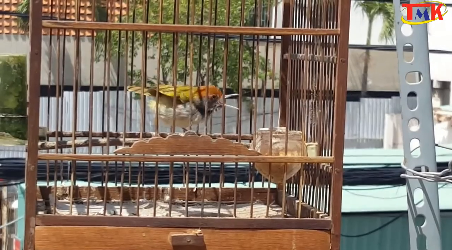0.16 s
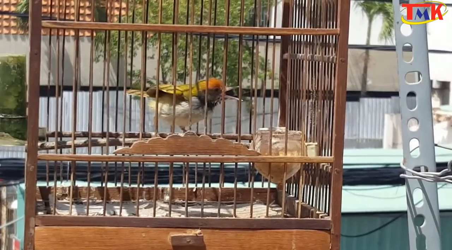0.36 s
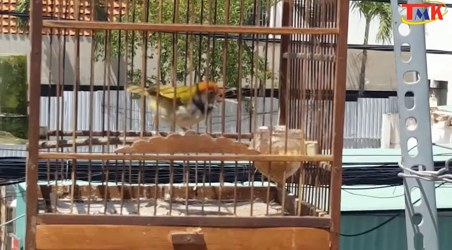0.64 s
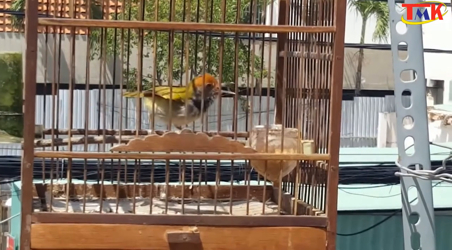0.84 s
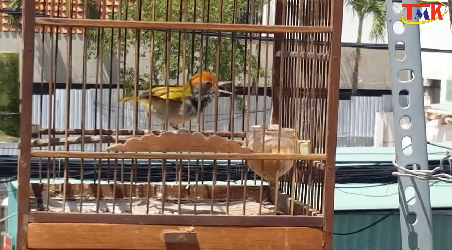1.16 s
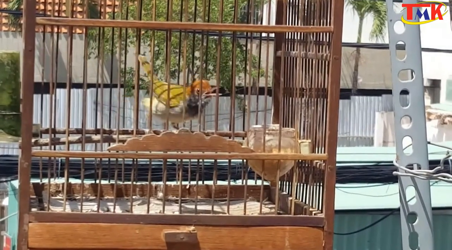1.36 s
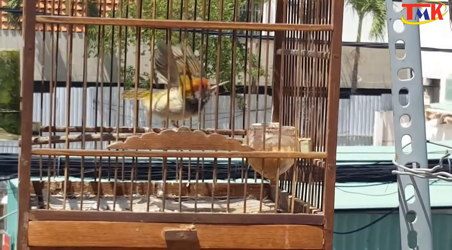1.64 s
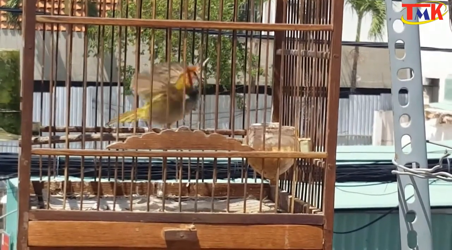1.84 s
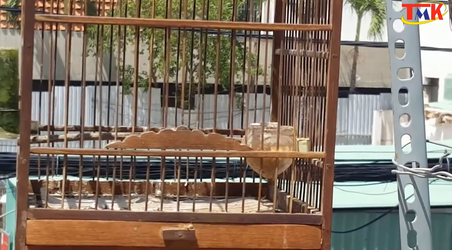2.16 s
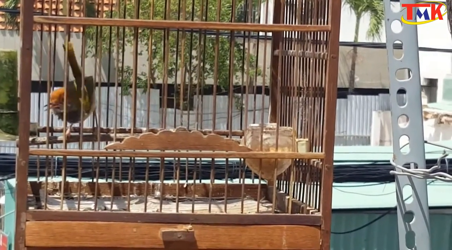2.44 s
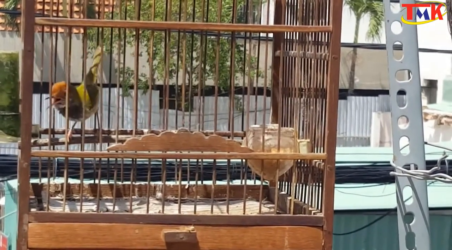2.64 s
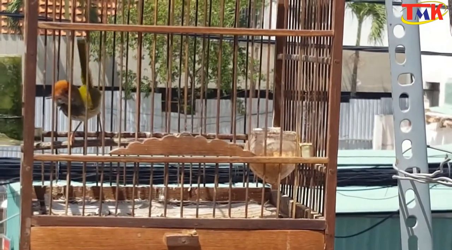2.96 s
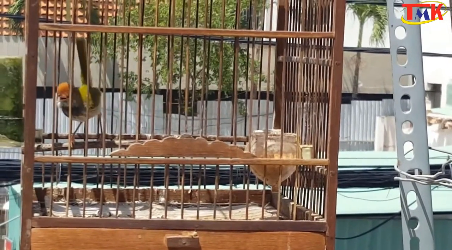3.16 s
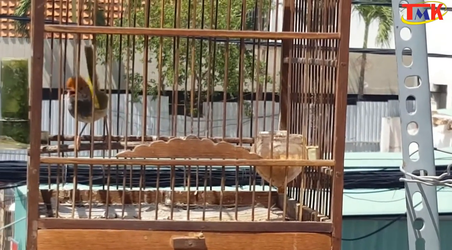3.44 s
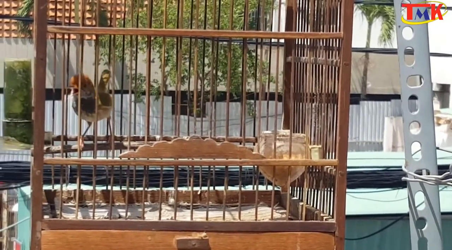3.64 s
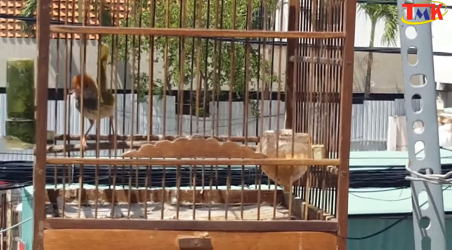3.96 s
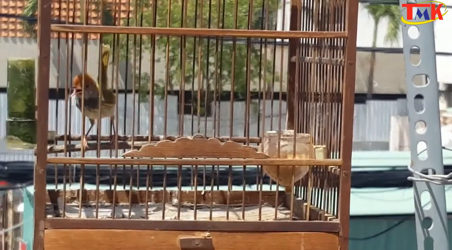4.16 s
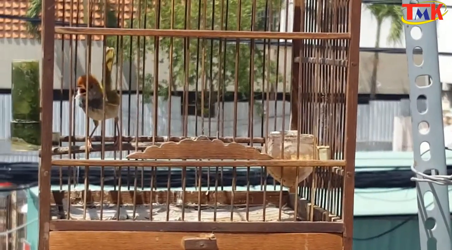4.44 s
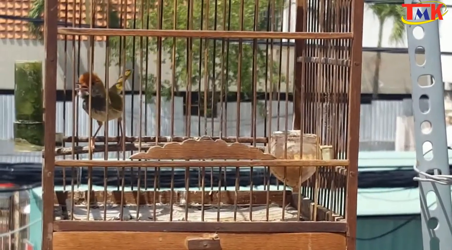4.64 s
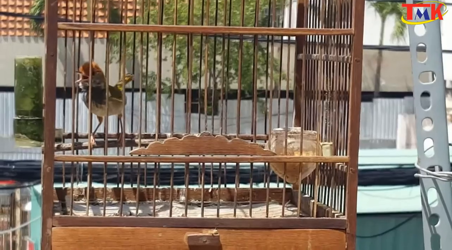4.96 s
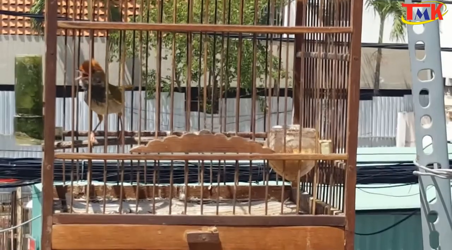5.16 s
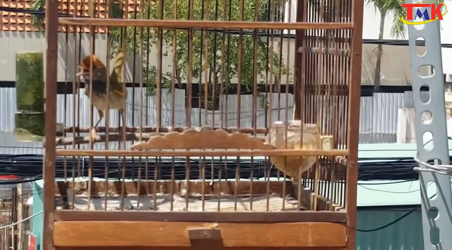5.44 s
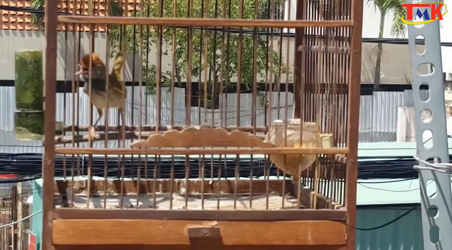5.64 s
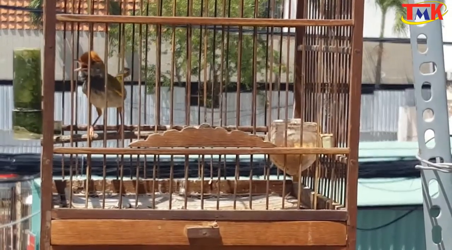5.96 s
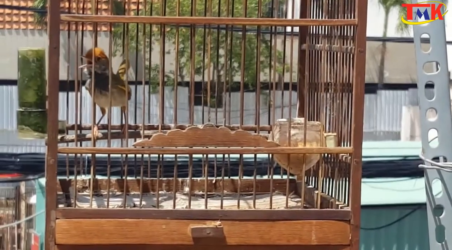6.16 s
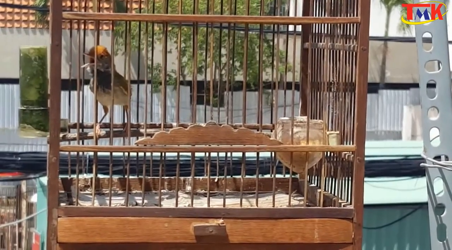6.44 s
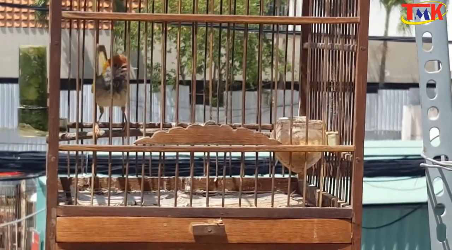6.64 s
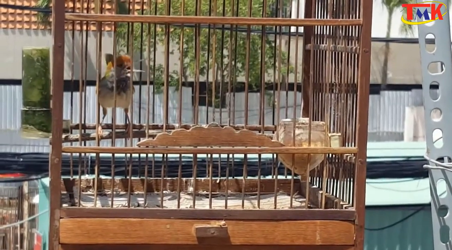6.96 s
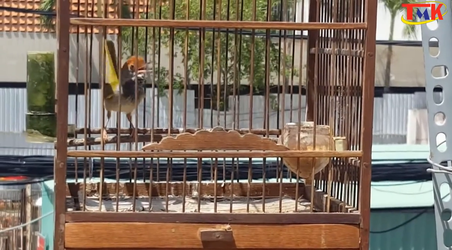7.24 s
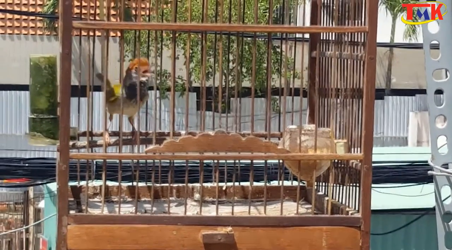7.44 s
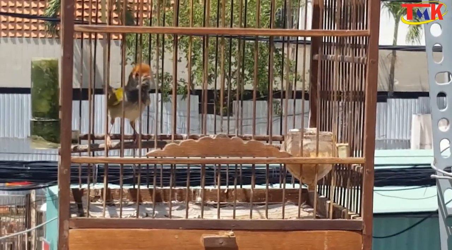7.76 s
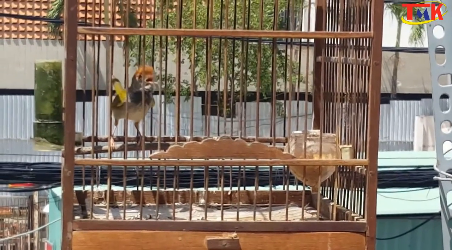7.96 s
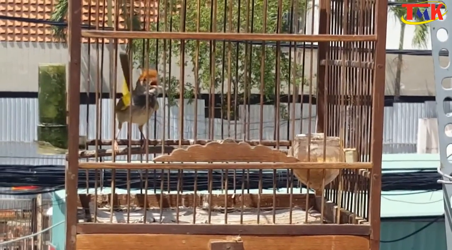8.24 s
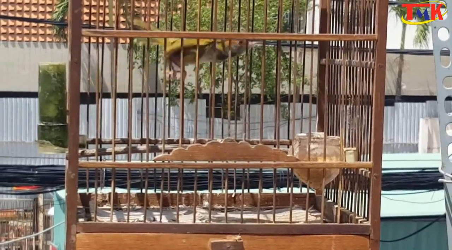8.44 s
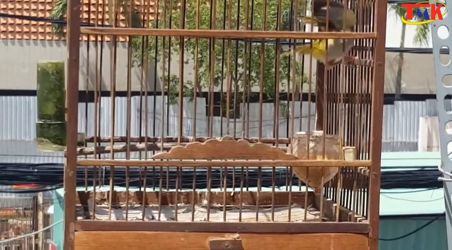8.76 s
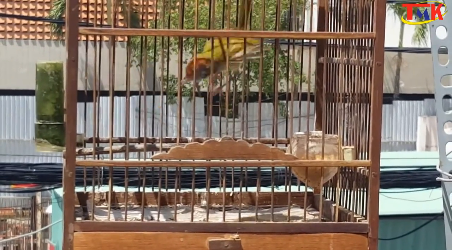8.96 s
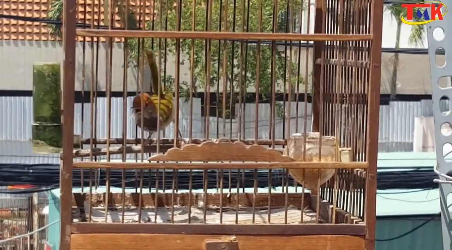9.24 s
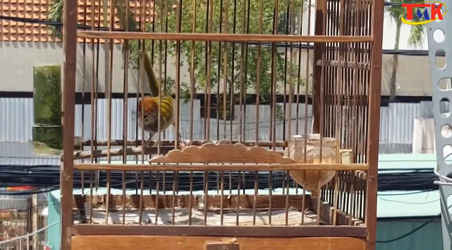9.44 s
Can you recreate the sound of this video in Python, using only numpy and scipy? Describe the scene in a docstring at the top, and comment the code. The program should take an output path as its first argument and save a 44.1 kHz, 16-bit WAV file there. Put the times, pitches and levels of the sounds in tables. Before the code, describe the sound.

A close, bright, slightly left-sided songbird gives seven evenly shaped bursts over nearly ten seconds, each a sharp tick, a fast crescendo of machine-like pulses and an abrupt clear final note. Less prominent birds around the terrace answer with thin whistles, rough chirps, fluttering falls and quick slurs, busiest between three and five seconds. Wall reflections blur them; low, quiet, steady distant traffic lies underneath, heard through an open outdoor microphone.

```python
"""A small caged bird on a roof terrace sings seven times: a chip, a swelling trill, a held note,
each a near-sine tone that follows a pitch and level curve.
Other birds whistle, slur, dip and chirp with rougher tones; sparse reflections smear them off the walls.
Underneath, shaped noise makes the low roar of a city, with two wavering engine drones."""
import sys
import numpy as np
from scipy import signal
from scipy.io import wavfile
from scipy.ndimage import uniform_filter1d

SR = 44100
rng = np.random.default_rng(int(sys.argv[2]) if len(sys.argv) > 2 else 0)


def digitize_waveform(pressure):
    """Quantize a signal to 16-bit integers and store it at the path in sys.argv[1].

    Rows of a 2-D input are taken as channels; values are limited to [-1, 1].
    """
    field = np.atleast_2d(pressure).T
    bounded = np.clip(field, -1, 1)
    quanta = np.round(bounded * 32767).astype(np.int16)
    wavfile.write(sys.argv[1], SR, quanta)


N = 423801  # length of the scene [samples]

# colour of the city noise: (frequency [Hz], relative density [dB per Hz])
CITY_SPECTRUM = [(25, -42), (50, -28), (85, -0.5), (105, 5.5), (138, -5), (190, -8.5), (900, -22),
                 (3000, -26.5), (8500, -35.5), (9600, -48.5), (13000, -59), (15500, -48.5)]
# slow swell of the city noise: (time [s], level [dB]); each band scales the moves about the mean
TRAFFIC_SWELL = [(0, -32), (.8, -33), (2.201, -33), (4.299, -32), (6.299, -33), (7.8, -34.5), (9.6, -35)]
# stereo likeness of the city noise: (frequency [Hz], left-right correlation [-1 to 1])
STEREO_LIKENESS = [(60, 0.95), (300, 0.87), (1500, -0.15), (4000, -0.028)]
# treble haze and far chirps: (time [s], level [dB]); only scaled moves about the mean are heard
TREBLE_SWELL = [(0, -59), (1.1, -50.5), (2.7, -56), (4.199, -54), (5.0, -47.5), (5.55, -55.5), (7.6, -49.5),
                (7.9, -57.5), (8.4, -62), (8.9, -47), (9.6, -49.5)]
# distant engines: (frequency [Hz], bandwidth [Hz], level [dB])
ENGINE_DRONES = [(80.2, 8.8, -42), (139.13, 3.2, -37.5)]

# husky level chirps, farther off: (time [s], pitch [Hz], level [dB])
CHEEP_CALLS = [(1.317, 5460, -41.5), (1.5, 5510, -37.5), (2.033, 5440, -39), (2.188, 5470, -38.5),
               (2.791, 4500, -44), (3.15, 4540, -45.5), (7.03, 6090, -37), (8.178, 6030, -47.5),
               (8.76, 5650, -48), (5.77, 4900, -51), (4.41, 6240, -44), (4.53, 6480, -40.5),
               (5.133, 6600, -40), (5.187, 6000, -36), (8.997, 7100, -40), (9.038, 5810, -37.5),
               (9.085, 4520, -46.5), (9.513, 5220, -40)]
CHEEP_S = 0.056
# rising chirps: (time [s], start pitch [Hz], level [dB])
TWEET_CALLS = [(0.691, 4700, -46.5), (2.29, 4860, -34.5), (2.444, 5370, -34), (5.022, 4780, -38),
               (5.397, 5500, -43.5), (5.824, 5690, -38), (5.998, 5760, -38), (6.06, 4260, -37.5),
               (6.191, 5296, -38.5), (6.456, 5540, -39.5), (7.437, 5540, -45.5), (8.861, 5380, -44.5)]
TWEET_S, TWEET_HALF, TWEET_TOP = 0.044, 1.2, 1.32  # length [s]; pitch factors halfway and at the end
# short bent notes of several kinds:
# (time [s], length [s], start pitch [Hz], bend pitch [Hz], end pitch [Hz], level [dB])
BENT_NOTES = [(0.083, 0.011, 4230, 3700, 3450, -35), (2.827, 0.069, 6640, 5150, 6790, -33),
              (2.985, 0.11, 7050, 6350, 5766, -33.5), (3.183, 0.079, 7160, 5460, 6890, -28),
              (3.357, 0.1, 6240, 6650, 5740, -30.5), (3.518, 0.079, 5020, 4880, 4790, -35.5),
              (3.586, 0.035, 4790, 5610, 5720, -31.5), (3.614, 0.072, 8100, 6320, 5230, -30),
              (3.773, 0.12, 4440, 5920, 4700, -31.5), (3.989, .1, 8280, 7940, 8070, -35.5),
              (4.755, 0.024, 6980, 6920, 6440, -29), (4.854, 0.1, 5560, 5240, 6050, -37.5),
              (8.237, .12, 4550, 4350, 3190, -47.5), (9.374, 0.078, 8070, 7540, 6600, -42.5)]
# shares of the note: about where it bends, where it settles on its end pitch, and
# the turn, which holds the bend pitch from half a turn before to one turn after
BEND, SETTLE, TURN = 0.32, 0.74, .08

# level whistles around the terrace: (time [s], length [s], middle pitch [Hz], level [dB])
WHISTLE_CALLS = [(0, 0.11, 2490, -43.5), (1.078, 0.28, 2470, -49), (1.587, 0.26, 2120, -48),
                 (2.318, 0.094, 2367, -44.5), (2.459, 0.11, 2444, -46), (2.586, 0.1, 2483, -35.5),
                 (3.017, 0.19, 2126, -44.5), (3.114, 0.062, 3200, -48), (3.681, 0.33, 2438, -46),
                 (4.006, 0.078, 3705, -33), (4.018, 0.058, 4250, -29), (4.014, 0.074, 3253, -30.5),
                 (4.702, 0.2, 2126, -47.5), (5.057, 0.32, 2475, -42), (6.397, 0.068, 2463, -44.5),
                 (6.52, 0.17, 2460, -44.5), (6.794, 0.193, 3098, -40), (6.877, 0.24, 2123, -41),
                 (7.637, 0.31, 2476, -43.5), (8.608, 0.036, 3070, -37), (8.631, 0.295, 3070, -42),
                 (8.89, 0.056, 2090, -49), (8.95, 0.185, 2125, -45), (9.207, 0.15, 2500, -46.5)]
CREEP_PER_S = 0.07  # whistles creep upward by this share of their pitch [1/s]
SCOOP, SCOOP_S = .97, .03  # whistles scoop up from this pitch factor, over at most this time [s]
# long fluttering falls: (time [s], length [s], top pitch [Hz], bottom pitch [Hz], level [dB])
FALL_CALLS = [(3.5, .13, 4204, 3550, -38.5), (3.723, .24, 4600, 3550, -33.5), (4.091, .21, 4610, 3180, -36),
              (4.386, 0.21, 4595, 3220, -35)]
HOOK_S, HOOK = .028, .94  # each fall hooks up to its top by this time [s], from this pitch factor
# quick upward flicks, most of them closing a whistle: (time [s], start pitch [Hz], level [dB])
FLICK_CALLS = [(0.088, 2470, -28.5), (.997, 2600, -28), (1.338, 2400, -25.5), (2.688, 2615, -27),
               (2.715, 2900, -30), (4.018, 2455, -25), (5.334, 2440, -25.5), (6.664, 2434, -24.5),
               (6.948, 3030, -25.5), (7.93, 3450, -34), (7.937, 2464, -27), (8.906, 3020, -25.5),
               (9.33, 2480, -27)]
# a flick waits [s], rises [s] and ends [s]; pitch factor at its top
FLICK_WAIT_S, FLICK_RISE_S, FLICK_S, FLICK_TOP = 0.01025, 0.023, .052, 1.36
# quick drops: (time [s], length [s], start pitch [Hz], level [dB])
DROP_CALLS = [(0.163, 0.047, 3840, -25.5), (0.396, 0.051, 3600, -28.5), (1.032, 0.044, 3420, -31.5),
              (1.533, 0.031, 2980, -35), (2.742, 0.051, 3800, -28), (2.931, 0.03, 3040, -36),
              (3.19, 0.059, 3450, -31.5), (4.415, 0.064, 3480, -28), (4.646, 0.025, 2900, -38),
              (6.376, 0.059, 3280, -31.5), (6.595, 0.039, 3440, -29.5), (6.841, 0.019, 2900, -34.5),
              (7.324, 0.036, 3370, -30.5), (7.504, 0.051, 2980, -34.5), (8.563, 0.021, 3070, -37.5),
              (8.855, 0.024, 2920, -38.5)]
DROP_END_HZ = 1910
DROP_HANG, DROP_FLAT = 0.33, .75  # shares of a drop's length: it hangs near its top, falls, then flattens
# a rough wavering chatter: (time [s], length [s], start pitch [Hz], end pitch [Hz], level [dB])
CHATTER_CALLS = [(0.752, 0.1, 3000, 3450, -33.5), (0.74, 0.13, 2750, 3020, -38),
                 (1.473, 0.055, 2850, 2686, -42.5)]
# shape of a loud dip-and-rise call: (time [s], pitch [Hz], relative level [dB])
DIP_SHAPE = [(0, 3736, -17), (.004, 3665, 10.5), (.023, 3276, 9.5), (.034, 2168, -17.5), (.046, 3117, 8.5),
             (.056, 3405, 12.5), (.068, 3680, 13.5), (.08, 4290, 3), (.09, 3880, -20)]
# when it calls: (time [s], added level [dB])
DIP_CALLS = [(1.866, -25.5), (3.26, -26), (4.95, -24.5), (7.152, -25.5), (9.157, -24.5)]
# shape of a near, piercing falling call: (time [s], pitch before its factor [Hz], relative level [dB])
SEEP_SHAPE = [(0, 6300, -30), (.009, 7380, -7), (.034, 7250, -3), (.056, 6700, 0), (.088, 5950, -20)]
# when it calls: (time [s], pitch factor, added level [dB])
SEEP_CALLS = [(0.462, 1.05, -30.5), (1.046, 1.005, -17.5), (6.809, 1., -15.5)]

# the caged bird's songs:
# (chip time [s], held note start [s], held note end [s], added level [dB], left-right balance [dB])
SONG_TIMES = [(.8381, 1.318, 1.368, -16.5, 6), (2.5098, 2.980, 3.016, -16.5, 5),
              (3.4279, 3.949, 3.994, -16.5, 5.5), (4.7356, 5.214, 5.252, -16, 5),
              (6.0511, 6.533, 6.586, -16, 6.5), (7.2744, 7.756, 7.796, -15, 5.5),
              (9.1573, 9.632, 9.67, -15.5, 4)]
# its chip: (time about the chip time [s], pitch [Hz], relative level [dB])
CHIP_SHAPE = [(-.002, 5300, -20), (-.0012, 4850, -1), (.0008, 4140, 1.5), (.003, 3360, -9.5),
              (.005, 2850, -20)]
# trill pulses through the song:
# (share of the trill [0-1], middle pitch [Hz], upward glide [Hz], length [s], relative level [dB])
TRILL_SHAPE = [(0, 3340, 695, .008, -11), (.2, 3470, 260.5, .009, -6.5), (.5, 3440, 69.5, 0.009, -4),
               (1, 3430, -37, 0.0084, 0)]
# its last held note: (share of the note [0-1], pitch [Hz], relative level [dB])
HELD_SHAPE = [(0, 3640, -47), (.08, 3462, 2.5), (.35, 3560, -2.5), (.55, 3604, 3.5), (.85, 3550, 1),
              (1, 3500, -15.5)]
# trill gaps after the chip and before the held note [s], and rough beat [s]; the slow start adds delay
TRILL_AFTER_S, TRILL_BEFORE_S, BEAT_S = .0553, .029, .022

EDGE_HZ = 15720  # top of the recorder's band


def gain_of(db):
    """Turns decibels into a linear gain."""
    return 10 ** (np.asarray(db) / 20)


def evened(x):
    """Scales a signal to an rms of one."""
    return x / np.sqrt(np.mean(x ** 2) + 1e-20)


def read(points, hz):
    """Reads a spectral curve along a logarithmic frequency axis."""
    f, value = np.transpose(points)
    return np.interp(np.log(hz + 1), np.log(f + 1), value)


def add(mix, s, sound, pan_db=0, lag=0):
    """Mixes a sound into both channels; the right one hears it lag samples later."""
    for channel, side in enumerate((.5, -.5)):
        start = max(round(s * SR) + channel * lag, 0)
        part = mix[channel, start:][:len(sound)]
        part += gain_of(side * pan_db) * sound[:len(part)]


def note(rows, rough=0., octave_db=-36.0, low_db=-np.inf, fourth_db=-np.inf):
    """A near-sine syrinx tone on rows (time [s], pitch [Hz], rms [dB]); roughness shakes pitch and level."""
    s, hz, db = np.transpose(rows)
    t = np.arange(s[0], s[-1], 1 / SR)
    noise = rng.standard_normal((2, len(t)))
    pitch_shake, level_shake = evened(signal.oaconvolve(noise, np.hanning(90)[None], "same"))
    pitch = np.interp(t, s, hz) * (1 + 0.055 * rough * pitch_shake)
    phase = 2 * np.pi * (np.cumsum(pitch) / SR + rng.random())
    wave = np.sin(phase) + gain_of(octave_db) * np.sin(2 * phase)
    wave += gain_of(low_db) * np.sin(phase / 2)  # an octave below
    wave += gain_of(fourth_db) * np.sin(4 * phase)
    level = uniform_filter1d(np.interp(t, s, gain_of(db)), size=40, mode="constant")
    return np.sqrt(2) * level * (1 + rough * level_shake) * wave


def glide(length, hz, db, swell_db, edge):
    """Rows of a note through three pitches that swells, with edges of at most the given seconds."""
    edge = min(edge, 0.063 * length)
    s = np.array([0, edge, length / 2, length - edge, length])
    shape_db = np.array([-30, -swell_db, 0, swell_db, -30])
    return np.transpose([s, np.interp(s, [0, length / 2, length], hz), db + shape_db])


def walls(x, t60, first):
    """Sparse decaying reflections of random sign and uneven size, different in each channel."""
    slots = np.arange(0, SR // 2 - 20, 20)  # one reflection in every 20 samples
    taps = np.zeros((2, SR // 2))
    at = slots + rng.integers(0, 20, (2, len(slots)))
    np.put_along_axis(taps, at, rng.laplace(size=at.shape), 1)
    t = np.arange(SR // 2) / SR
    taps *= gain_of(-60 * t / t60) * (t > first)
    return signal.fftconvolve(x, taps / np.linalg.norm(taps[0]), axes=1)[:, :N]


def treble_db(s):
    """The treble's level about its mean."""
    when, db = np.transpose(TREBLE_SWELL)
    return np.interp(s, when, db - db.mean())


def flutter(depth_db, size):
    """Gain that wavers as moving air bends the path of a far call."""
    drift = uniform_filter1d(rng.standard_normal(N), size=size)
    drift = evened(uniform_filter1d(drift, size=size))
    return gain_of(depth_db * np.clip(drift, -3, 1.5))


def city():
    """Random short-time spectra with drifting patches; all swells with the traffic, the bass most."""
    frames, hz = N // 256 + 5, np.fft.rfftfreq(1024, 1 / SR)
    frame_s = np.arange(frames) * 256 / SR
    a, b, c, d, patches = rng.standard_normal((frames, 513, 5)).T
    patches = uniform_filter1d(patches, 14, 0)
    patches = evened(uniform_filter1d(patches, 14, 1))
    s, db = np.transpose(TRAFFIC_SWELL)
    swell_db = np.interp(frame_s, s, db - db.mean())
    same = np.clip(read(STEREO_LIKENESS, hz), -1, 1)[:, None]
    left, other = a + 1j * b, c + 1j * d
    z = np.array([left, same * left + np.sqrt(1 - same ** 2) * other])
    patchy_db = 0.44 + 5.6 * hz / (hz + 5000)  # the treble is patchier
    swell_share = 1.22 + 0.64 / (1 + hz / 600)
    z *= gain_of(read(CITY_SPECTRUM, hz)[:, None] + patchy_db[:, None] * patches
                 + swell_share[:, None] * swell_db)
    flicker = evened(uniform_filter1d(rng.standard_normal(frames), size=7))  # the treble flickers all at once
    z *= gain_of(5. * np.clip(hz / 9000 - .3, 0, 1)[:, None] * flicker)
    z *= gain_of(0.84 * np.clip(hz / 6000 - .3, 0, 1)[:, None] * treble_db(frame_s))
    noise = signal.istft(z, nperseg=1024, noverlap=768)[1][:, :N]
    balance_db = np.array([[1.2], [-.3]])  # left, right
    return gain_of(db.mean() + balance_db) * evened(noise)


def hum():
    """Distant engines: two narrow noise bands heard as wavering drones, alike in both channels."""
    out = np.zeros(N)
    for hz, width, db in ENGINE_DRONES:
        turn = np.exp(2j * np.pi * hz * np.arange(N) / SR)
        r = np.exp(-np.pi * width / SR)
        # smooth the noise around 0 Hz, then shift it up to the drone's frequency
        slow = signal.lfilter([1 - r], [1, -r], rng.standard_normal(N) / turn)
        out += gain_of(db) * evened((turn * slow).real)
    return out


def small_birds():
    """Husky chirps and short bent notes with a weak lower octave, and fainter random chirps from far roofs."""
    out = np.zeros((2, N))
    for s, hz, db in CHEEP_CALLS:
        rows = glide(CHEEP_S, [hz] * 3, db, swell_db=.9, edge=.006)
        add(out, s, note(rows, rough=.55, low_db=-12.), pan_db=1.5, lag=2)
    for s, hz, db in TWEET_CALLS:
        rise = hz * np.array([1, TWEET_HALF, TWEET_TOP])
        rows = glide(TWEET_S, rise, db, swell_db=4., edge=.006)
        add(out, s, note(rows, rough=.7, low_db=-18.), pan_db=1.5, lag=2)
    for s, length, start_hz, bend_hz, end_hz, db in BENT_NOTES:
        rows = [(0, start_hz, db - 12.0),
                ((BEND - TURN / 2) * length, bend_hz, db - 0.5),
                ((BEND + TURN) * length, bend_hz, db),
                (SETTLE * length, end_hz, db + 0.7),
                (0.78 * length, end_hz, db + 0.5),
                (length, end_hz, db - 24)]
        add(out, s, note(rows, rough=0.27, low_db=-23.0), pan_db=1.5, lag=2)
    # far chirps at random times, louder when the treble is
    for when, low, rise, loud in rng.random((50, 4)):
        s = when * N / SR
        hz = (4500 + 2500 * low) * (1 + 0.22 * (rise - .3) * np.arange(3))
        db = -58 + 7 * loud + 1.1 * treble_db(s)
        rows = glide(0.06, hz, db, swell_db=-5.0, edge=0.021)
        add(out, s, note(rows, rough=0.7), pan_db=6.0)
    out *= flutter(2., size=350)
    return out + gain_of(-1.5) * walls(out, t60=.25, first=.003)


def whistles_and_falls():
    """Scooped, creeping whistles and long hooked falls that waver as the air moves."""
    out = np.zeros((2, N))
    for s, length, hz, db in WHISTLE_CALLS:
        creep = hz * (1 + CREEP_PER_S * length * np.array([-.7, 0, .3]))
        rows = glide(length, creep, db, swell_db=5., edge=.03)
        rows = np.insert(rows, 2, [min(SCOOP_S, length / 4), creep[0], db + 1.5], axis=0)
        rows[:2, 1] *= SCOOP
        add(out, s, note(rows, rough=.12, octave_db=-35.), lag=3)
    for s, length, top_hz, low_hz, db in FALL_CALLS:
        rows = [(0, HOOK * top_hz, db - 14),
                (.008, HOOK * top_hz, db + 2.5),
                (HOOK_S, top_hz, db - 0.5),
                (length - .012, low_hz, db + 3.5),
                (length, low_hz, db - 22)]
        add(out, s, note(rows, rough=.27, octave_db=-35.), lag=3)
    return out * flutter(2.7, size=650)


def slurs():
    """Quick flicks, drops and chatter: rough tones with fast pitch slides, wavering with the air."""
    out = np.zeros((2, N))
    for s, hz, db in FLICK_CALLS:
        rows = [(0, hz, db - 9),
                (FLICK_WAIT_S, 1.03 * hz, db - 4.5),
                (FLICK_WAIT_S + FLICK_RISE_S, .96 * FLICK_TOP * hz, db),
                (0.84 * FLICK_S, FLICK_TOP * hz, db - 7.5),
                (FLICK_S, FLICK_TOP * hz, db - 23.5)]
        add(out, s, note(rows, rough=.2), lag=5)
    for s, length, hz, db in DROP_CALLS:
        rows = [(0, hz, db - 14.5),
                (0.133 * length, .95 * hz, db + 4.5),
                (DROP_HANG * length, .88 * hz, db - 0.5),
                (DROP_FLAT * length, 1.1 * DROP_END_HZ, db - 6.5),
                (length, DROP_END_HZ, db - 11)]
        add(out, s, note(rows, rough=.2), lag=5)
    for s, length, start_hz, end_hz, db in CHATTER_CALLS:
        rows = glide(length, [start_hz, end_hz, end_hz], db, swell_db=.5, edge=.01)
        add(out, s, note(rows, rough=.55), lag=5)
    return out * flutter(3., size=260)


def neighbours():
    """Whistles, slurs, dips and seeps, every call heard partly off the walls, the near seeps least."""
    tones, quick = whistles_and_falls(), slurs()
    dips, seeps = np.zeros((2, 2, N))
    for s, db in DIP_CALLS:
        add(dips, s, gain_of(db) * note(DIP_SHAPE, octave_db=-45., fourth_db=-42.), lag=5)
    for s, factor, db in SEEP_CALLS:
        rows = SEEP_SHAPE * np.array([1, factor, 1])
        add(seeps, s, gain_of(db) * note(rows, rough=0.062, octave_db=-32.5), pan_db=-0.5, lag=2)
    send = gain_of(-3.5) * tones + gain_of(-1.2) * quick + gain_of(-5.5) * dips + gain_of(-6) * seeps
    return tones + quick + dips + seeps + walls(send, t60=.21, first=.003)


def singer():
    """Chip, a trill that starts slow and settles to its beat while it swells, then the held note."""
    out = np.zeros((2, N))
    share, *columns = np.transpose(TRILL_SHAPE)
    part = np.array([0, .2, .5, .78, 1])  # shares of one pulse
    for s, held, end, db, pan_db in SONG_TIMES:
        chip = gain_of(db) * note(CHIP_SHAPE, octave_db=-42.0)
        add(out, s + CHIP_SHAPE[0][0], chip, pan_db, lag=1)

        first, last = s + TRILL_AFTER_S, held - TRILL_BEFORE_S
        k = np.arange(round((last - first) / BEAT_S) + 1)
        slow_start = .009 * (1 - np.exp(-k / 4))  # growing delay stretches the first gaps
        starts = np.linspace(first, last, len(k)) + slow_start
        for start, progress in zip(starts, k / k[-1]):
            hz, rise_hz, length, pulse_db = (np.interp(progress, share, c) for c in columns)
            # quick rise, flat top, slower fall; each pulse a little louder or softer at random
            shape_db = np.array([-30, -1.5, 0, -4, -30]) + 1.3 * rng.standard_normal()
            rows = np.transpose([length * part, hz + rise_hz * (part - .5), db + pulse_db + shape_db])
            add(out, start, note(rows, octave_db=-45., fourth_db=-52.), pan_db, lag=1)

        held_rows = HELD_SHAPE * np.array([end - held, 1, 1])
        add(out, held, gain_of(db) * note(held_rows, octave_db=-36.5), pan_db, lag=1)
    near = gain_of(-11.5) * walls(out, t60=.045, first=.003)  # the cage and things close to it
    return out + near + gain_of(-13) * walls(out, t60=.3, first=.008)


def scene():
    """Layers the city bed, the birds around and the caged singer."""
    return city() + hum() + small_birds() + neighbours() + singer()


def record(dry):
    """The microphone loses the deepest bass; then the band limit of the recorder."""
    thin = signal.sosfilt(signal.butter(2, 55., "high", fs=SR, output="sos"), dry)
    band_limit = signal.firwin(511, EDGE_HZ, window=("kaiser", 9), fs=SR)
    return signal.oaconvolve(thin, band_limit[None], "same")


dry = scene()
out = record(dry)
digitize_waveform(out)
```